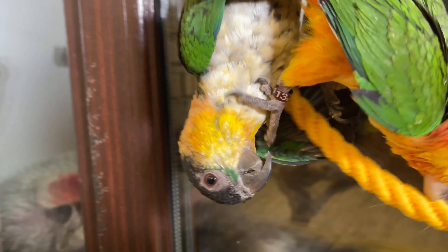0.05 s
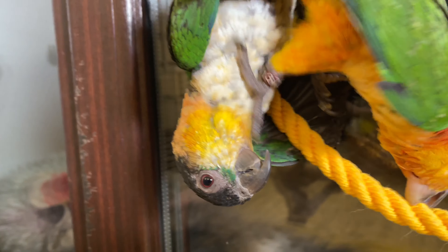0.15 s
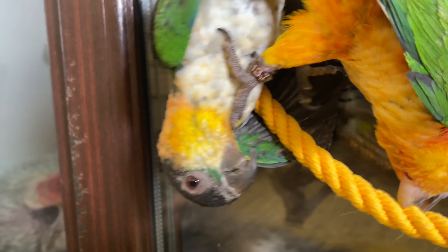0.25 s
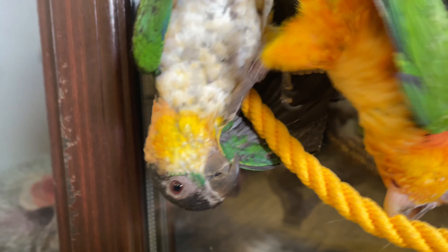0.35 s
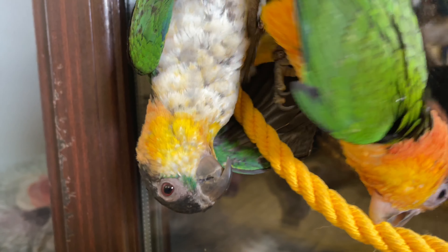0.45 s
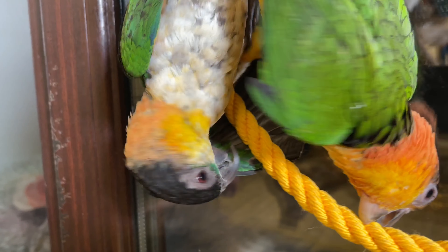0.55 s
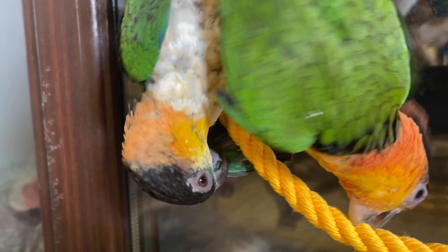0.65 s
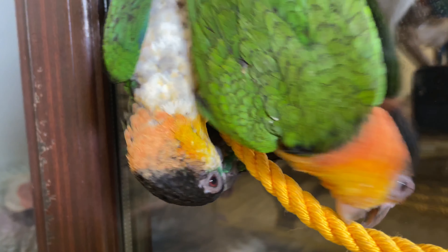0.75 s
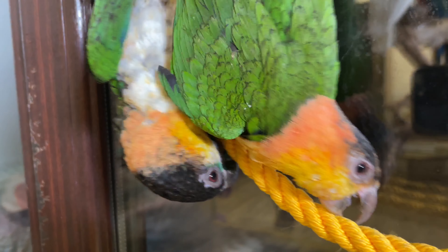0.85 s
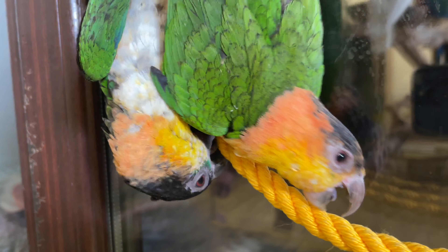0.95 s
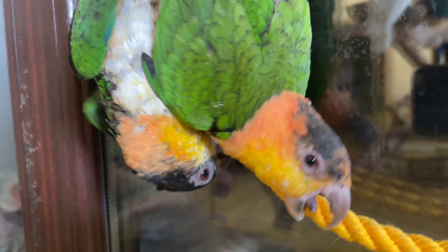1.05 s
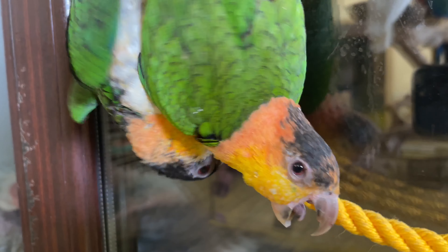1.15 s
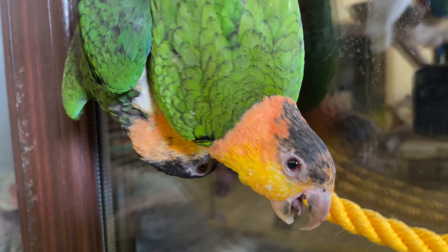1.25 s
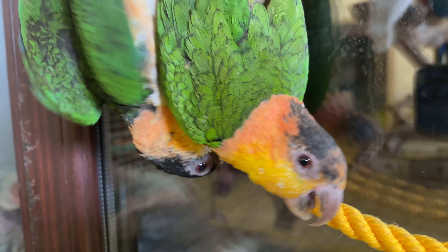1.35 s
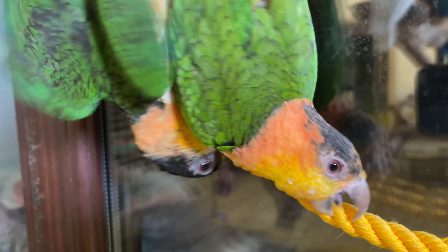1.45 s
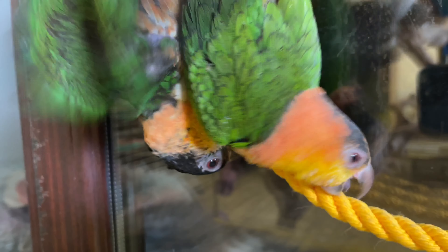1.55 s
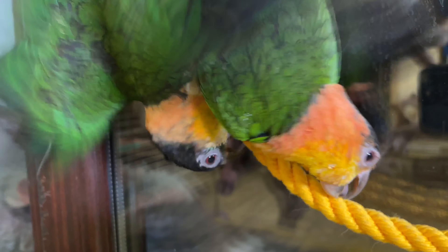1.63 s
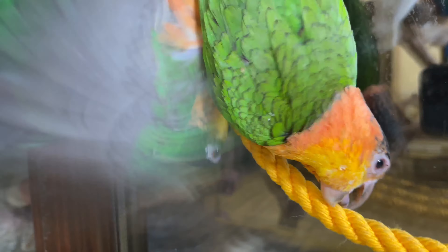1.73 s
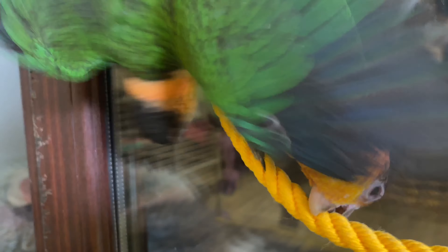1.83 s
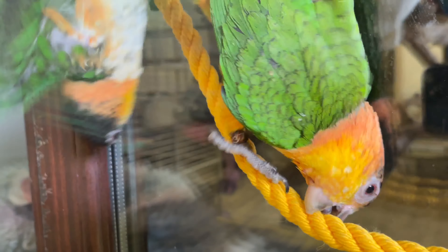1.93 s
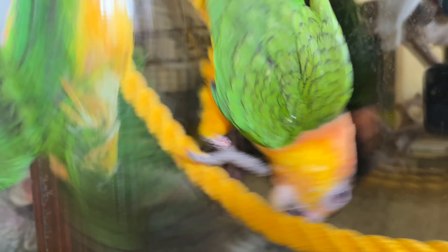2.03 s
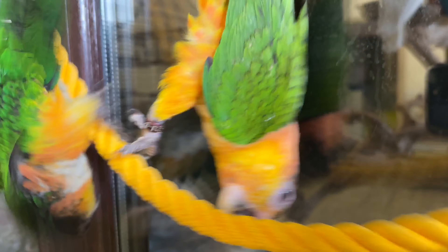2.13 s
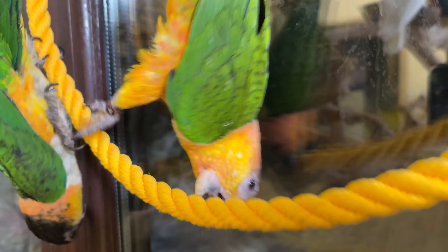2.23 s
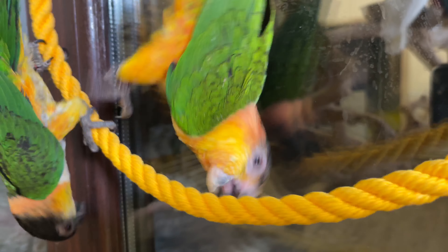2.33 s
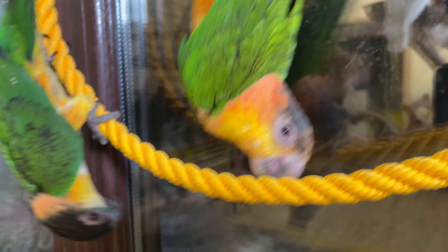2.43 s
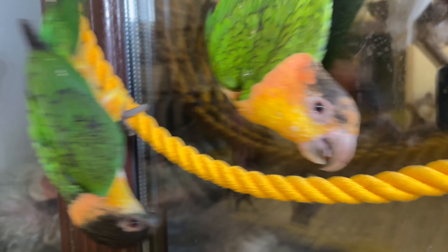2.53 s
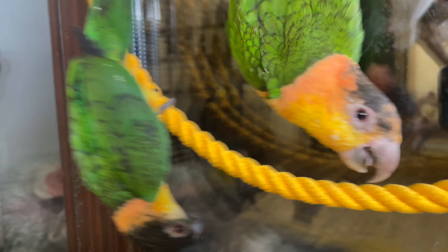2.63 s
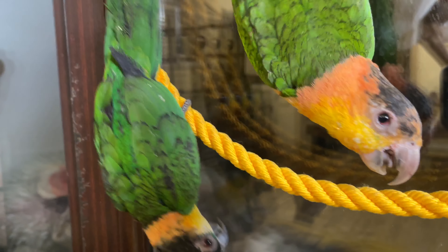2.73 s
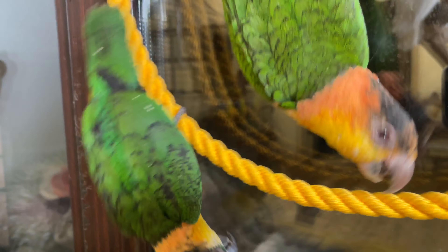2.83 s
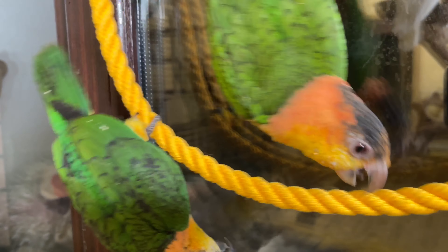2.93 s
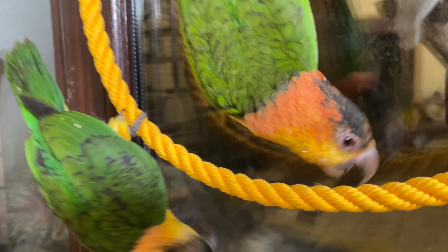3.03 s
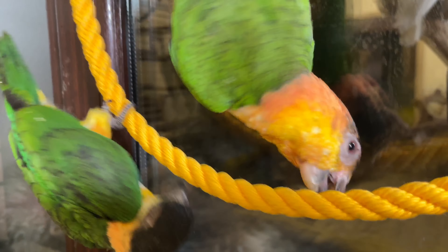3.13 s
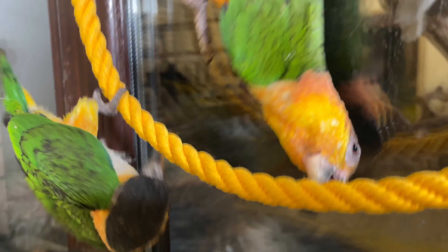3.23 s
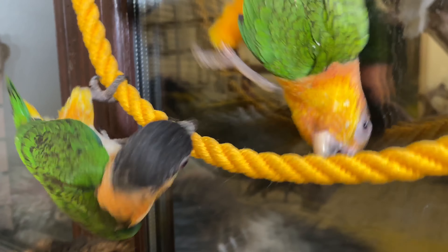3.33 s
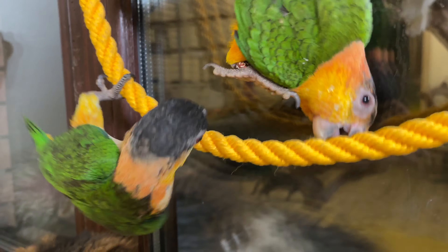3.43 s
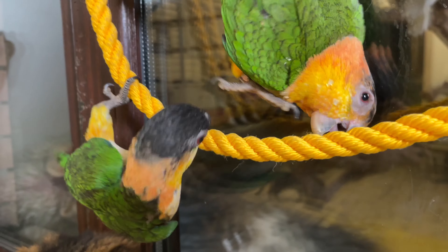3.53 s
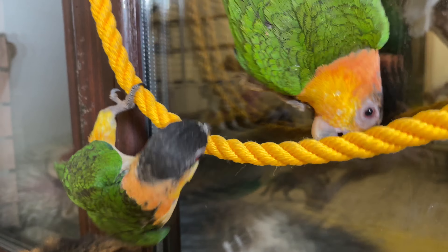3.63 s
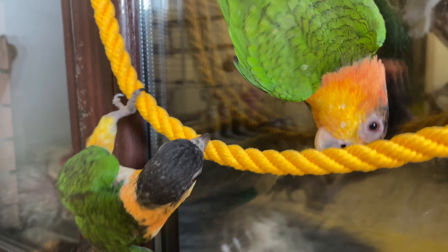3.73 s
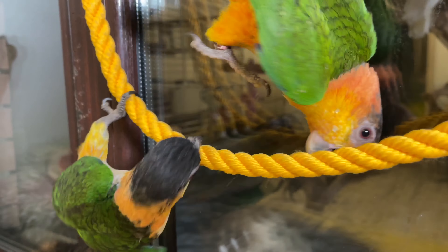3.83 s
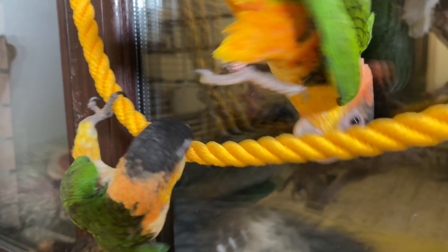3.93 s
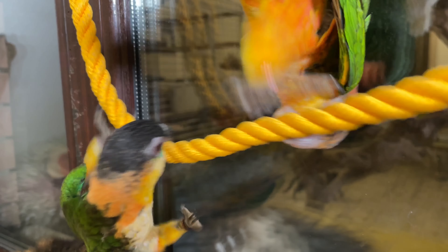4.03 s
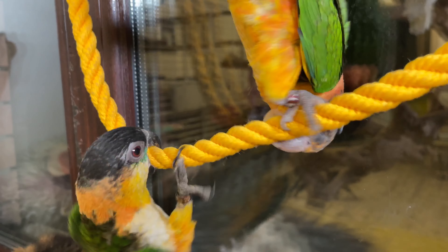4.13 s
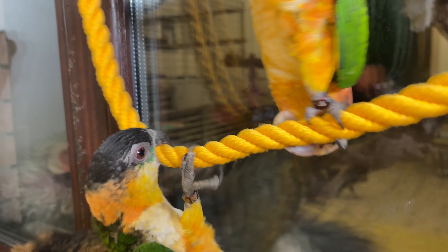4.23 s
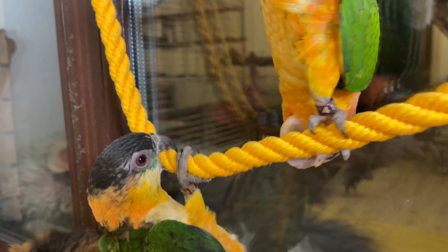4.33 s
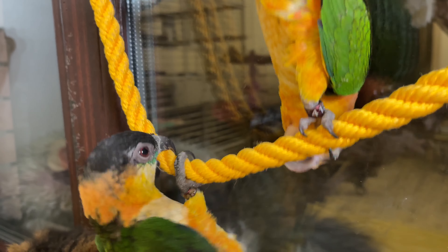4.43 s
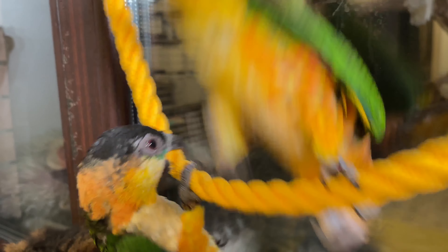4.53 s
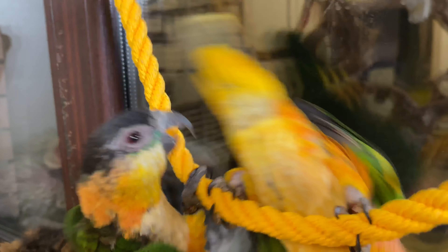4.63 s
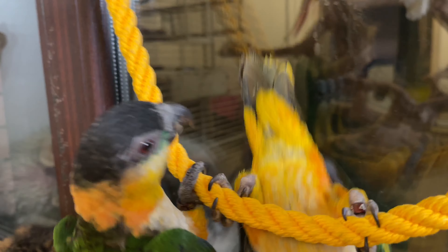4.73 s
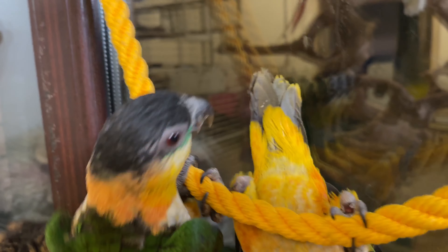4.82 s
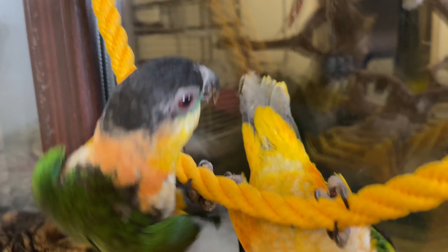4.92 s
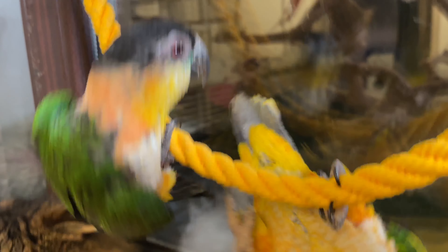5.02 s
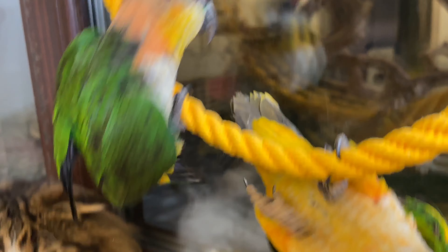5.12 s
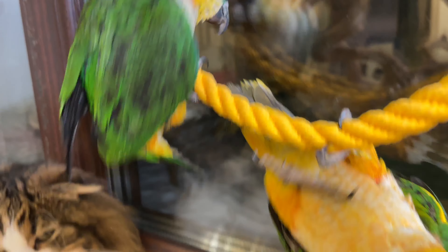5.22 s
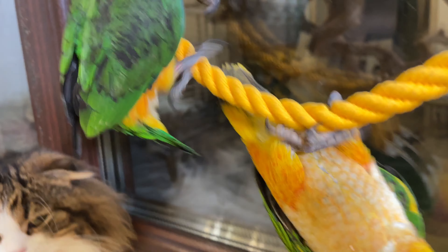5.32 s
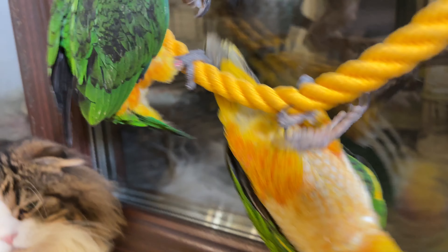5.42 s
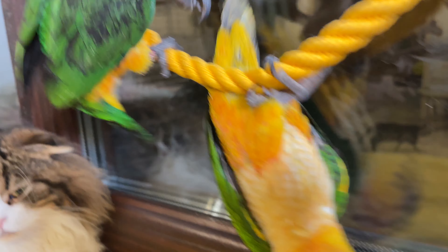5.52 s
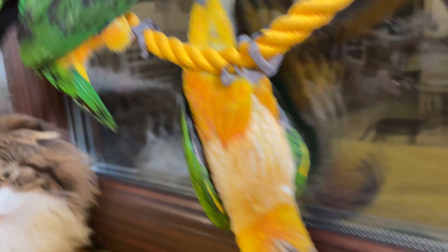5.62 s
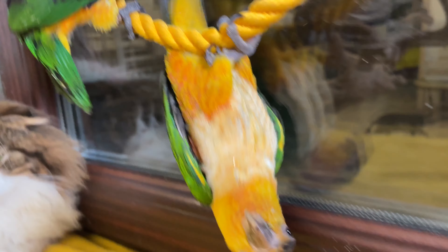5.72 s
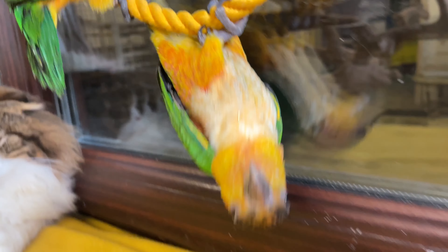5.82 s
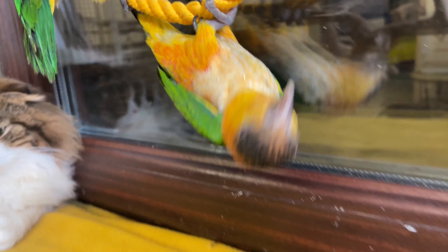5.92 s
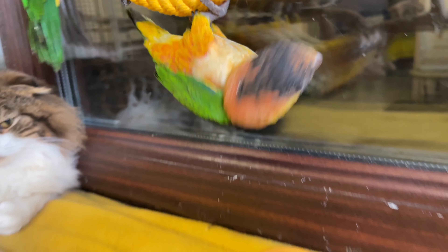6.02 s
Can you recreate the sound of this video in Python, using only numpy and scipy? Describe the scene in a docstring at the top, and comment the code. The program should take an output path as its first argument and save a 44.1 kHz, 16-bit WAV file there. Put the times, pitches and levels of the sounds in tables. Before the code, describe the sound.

Close stereo pickup indoors: steady low hum, soft rope rustle and plumage hiss. A few dry ticks of claws and beaks, one stronger before the wings start. Then rapid flapping bursts in, loud and bassy, puffing air at the microphone. It stops quickly, leaving irregular light clicks and scrapes, faint airy high noise, a woody knock late on and a small glassy tap near the end.

```python
"""Parrots climb on a rope by a window, in stereo: ropes rustle and plumage hisses (coloured noise) throughout.
Claws and beaks tick from early on: scratch, scrape and damped body note; modes of frame and pane ring when knocked.
From 1.6 to 2.1 s wings beat close by: feather slaps (noise bursts), air pushes (slowing swings), a quill snap.
From 3.1 to 5.1 s a thin high whisper comes and goes; more knocks follow on frame and glass.
All along, a motor in the house hums (sine orders) with a faint whine over quiet room tone (noise)."""
import sys
import numpy as np
from scipy import signal
from scipy.fft import rfft, irfft, next_fast_len
from scipy.io import wavfile
from scipy.ndimage import uniform_filter1d

SR = 44100
rng = np.random.default_rng(int(sys.argv[2]) if len(sys.argv) > 2 else 0)


def wrap_up_sound(samples):
    """Save the sound to the file named by the first command line argument, as 16-bit audio."""
    columns = np.atleast_2d(samples).T
    # keep every value between -1 and 1, then stretch to whole-number steps
    tamed = np.clip(columns, -1, 1)
    steps = np.round(tamed * 32767).astype(np.int16)
    wavfile.write(sys.argv[1], SR, steps)


N = 267598  # samples


def from_db(db):
    """Amplitude gain of a level in dB."""
    return 10 ** (np.asarray(db) / 20)


def rms_one(x):
    """Scale to rms 1."""
    return x / np.sqrt(np.mean(x ** 2) + 1e-20)


def at_hz(points, hz):
    """Read a spectrum table on a log frequency axis."""
    table_hz, value = np.transpose(points)
    return np.interp(np.log(hz), np.log(table_hz), value)


def butter(x, order, hz, kind="low"):
    """Butterworth filter."""
    return signal.sosfilt(signal.butter(order, hz, kind, fs=SR, output="sos"), x)


def drift(rate_hz):
    """Slow random wander of spread 1: two-pole lowpassed noise, drawn every 40 samples."""
    step, settle = 40, 2000  # samples, steps
    r = np.exp(-2 * np.pi * rate_hz * step / SR)
    draws = rng.standard_normal(N // step + settle + 2)
    slow = signal.lfilter([1], [1, -2 * r, r * r], draws)[settle:]
    return np.interp(np.arange(N) / step, np.arange(len(slow)), rms_one(slow))


# left-right correlation of diffuse noise, clipped to +-1: f/Hz, likeness
LIKENESS = [(60, 0.99), (130, 0.35), (290, 0.75), (640, 0.46), (1410, 0.24), (3100, 0.38), (6820, 0.52),
            (15000, -1.49)]
# close contacts reach the two ports apart: f/Hz, left lead/rad
LEAD = [(0, 5.6), (1120, 16), (1720, 3.6), (3100, 7.15), (3360, 7.43), (4820, 6.5), (5170, 7.95),
        (5510, 7.76), (7670, 14.63), (12800, 3.77), (13400, 3.8), (14800, 5), (15700, 27), (16500, 10)]


def noise(spectrum, grain_db=0, close=False):
    """Coloured stereo noise, rms 1: grain makes it crackly; a close source is mainly one wave at both ports."""
    size = next_fast_len(N)
    hz = np.arange(size // 2 + 1) * SR / size + 1
    grains = from_db(grain_db * np.minimum(rng.exponential(1, size), 4))
    mid, side = rfft(rng.standard_normal((2, size)) * grains)
    opposed = side * [[1], [-1]]
    if close:
        lead = np.interp(hz, *np.transpose(LEAD))
        pair = mid * np.exp([0 * lead, -1j * lead]) + 0.27 * opposed
    else:
        alike = np.clip(at_hz(LIKENESS, hz), -1, 1)
        pair = np.sqrt(1 + alike) * mid + np.sqrt(1 - alike) * opposed
    return rms_one(irfft(pair * from_db(at_hz(spectrum, hz)), size)[:, :N])


SPLIT_HZ = 6000


def treble_and_middle(spectrum, grain_db):
    """Close contact noise split into two bands, each rms 1."""
    bright = noise(spectrum, grain_db, close=True)
    return [rms_one(butter(bright, 4, SPLIT_HZ, kind)) for kind in ("high", "low")]


def ring(x, hz, t60_s):
    """Damped resonator: a unit click starts a sine of height 1."""
    r, w = from_db(-60 / (t60_s * SR)), 2 * np.pi * hz / SR
    return signal.lfilter([0, np.sin(w)], [1, -2 * r * np.cos(w), r * r], x + 1e-18)


def contact(start_s, rise_s, t60_s, crack_db, pan_db):
    """Slice and panned envelope of a touch: a short crack on a rise that dies away."""
    t = np.arange(round(.25 * SR)) / SR
    swell = (1 - np.exp(-t / rise_s)) * from_db(-60 * t / t60_s)
    crack = from_db(crack_db - 60 * t / 0.0064) * np.minimum(t / 0.00076, 1)
    start = round(start_s * SR)
    return slice(start, start + len(t)), (swell + crack) * from_db([[pan_db / 2], [-pan_db / 2]])


def knocks(hits, modes):
    """Every blow rings every mode, a little differently each time and at each port."""
    out = np.zeros((2, N))
    hit_s, hit_db = np.transpose(hits)
    at = [round(s * SR) for s in hit_s]
    for hz, mode_db, t60_s in modes:
        clicks = np.zeros((2, N))
        clicks[:, at] = from_db(hit_db + mode_db + rng.normal(0, 0.35, (2, len(at))))
        out += ring(clicks, hz, t60_s)
    return out


# wing gusts: t/s, level/dB, swing count at strongest, softness of start
PUSHES = [(1.6118, -15, 2.8, 4), (1.653, -14.5, 1.5, 3.5), (1.6743, 0.5, 1.52, 1.25),
          (1.7417, -8.5, 2.32, 4.9), (1.8165, -7, 2.48, 6.1), (1.861, -25.5, 1.7, 3.4),
          (1.887, -4.5, 2.19, 4.1), (1.938, -20.5, 1.9, 1.4), (1.957, -1.5, 1.82, 3.5),
          (1.997, -24.5, 2.4, 3.1), (2.029, -24, 2.5, 7.5)]
# turbulence on the gust: f/Hz, density/dB
EDDIES = [(120, -21), (250, 8), (400, -6), (700, -7.5), (1200, -41)]
EDDY_DB = -35.5  # re gust strength
FIRST_SWING_S, PUSH_TOP_HZ = 0.003016, 328
RIGHT_SLOWER, RIGHT_LATER_S, RIGHT_PUSH_DB = 1.066, 0.00015, -0.3


def air_pushes():
    """A gust rocks the capsules: each swing outlasts the one before; the far port feels it stretched."""
    out, t = np.zeros((2, N)), np.arange(N) / SR
    ports = [(0, 1, 0), (RIGHT_LATER_S, RIGHT_SLOWER, RIGHT_PUSH_DB)]
    for start_s, level_db, strongest, softness in PUSHES:
        near = slice(round(start_s * SR), round((start_s + .1) * SR))
        for port, (late_s, slower, trim_db) in enumerate(ports):
            since_s = np.maximum(t[near] - start_s - late_s, 0)
            swing = np.sqrt(since_s / (FIRST_SWING_S * slower))  # period grows steadily
            progress = swing / strongest
            size = progress ** softness * np.exp(softness / 2 * (1 - progress ** 2))
            out[port, near] -= from_db(level_db + trim_db) * size * np.cos(2 * np.pi * swing)
    gust = butter(out, 4, PUSH_TOP_HZ)
    strength = uniform_filter1d(np.abs(gust), size=400)
    return gust + from_db(EDDY_DB) * strength * noise(EDDIES)


# feather slaps: t/s, treble level/dB, middle level/dB, dull level/dB, t60/s
SLAPS = [(1.588, -37, -48, -41, 0.045), (1.598, -31, -42, -35, 0.13), (1.653, -12, -29, -30.5, 0.033),
         (1.6555, -42, -41, -27.5, 0.11), (1.7265, -30.5, -41, -32, 0.087), (1.7477, -44, -58, -39, .05),
         (1.8016, -35.5, -46, -36.5, 0.19), (1.867, -29, -34, -28.5, 0.11), (1.9064, -21, -48, -27, 0.035),
         (1.9362, -25, -33, -24, 0.058), (1.941, -30.5, -47, -30.5, 0.079), (2.003, -38, -47.5, -46, 0.15),
         (2.051, -34.5, -44.5, -41, 0.075)]
# feather on feather: f/Hz, density/dB
CLAP = [(880, -23), (1500, -12), (3630, -8), (3970, -6), (4300, -9), (4800, -14.5), (5530, -6.5),
        (6960, -12), (8770, -3), (10100, 0.5), (11400, -5), (12800, -13), (13900, -26), (15700, -18),
        (16500, -44)]
# dull puff: f/Hz, density/dB
DULL = [(90, -26), (150, 2), (300, 1), (450, -5.5), (700, -3.5), (1300, -18), (2200, -13.5), (4000, -41)]
SLAP_RISE_S, SLAP_CRACK_DB, SLAP_PAN_DB = 0.0016, -2, 3


def slaps():
    """Feathers clap and brush together: a crackly bright burst over a dull puff."""
    out = np.zeros((2, N))
    treble, middle = treble_and_middle(CLAP, grain_db=5.5)
    dull = noise(DULL)
    for start_s, treble_db, middle_db, dull_db, t60_s in SLAPS:
        at, shape = contact(start_s, SLAP_RISE_S, t60_s, SLAP_CRACK_DB, SLAP_PAN_DB)
        bright = from_db(treble_db) * treble[:, at] + from_db(middle_db) * middle[:, at]
        out[:, at] += shape * (bright + from_db(dull_db) * dull[:, at])
    return out


# wing tip snaps on the pane and bounces: t/s, level/dB
SNAPS = [(1.6539, -5.5), (1.6553, -16), (1.6570, -25), (1.6590, -30)]
# quill modes: f/Hz, level/dB, t60/s
QUILL = [(373, -3, 0.017), (3440, -6, 0.0067), (4440, -0.5, 0.0035), (8960, -2.5, 0.02),
         (10200, -16, 0.0081)]
SNAP_RIGHT_LATER_SAMPLES, SNAP_RIGHT_DB = 2, -6.5


def snap():
    """Hard quills ring on glass, nearer the left port."""
    left, right = knocks(SNAPS, QUILL)
    return np.array([left, from_db(SNAP_RIGHT_DB) * np.roll(right, SNAP_RIGHT_LATER_SAMPLES)])


FAINT_TICKS, FAINT_HZ, FAINT_T60_S = 12, 1010, 0.027
FAINT_DB, FAINT_SPREAD_DB = (-69.5, -62, -55), 5  # treble, middle, body


def faint_ticks():
    """Rows for small ticks at random times, with pitches within half an octave of the centre."""
    when, pitch = rng.random((FAINT_TICKS, 2)).T
    levels_db = np.array(FAINT_DB) + FAINT_SPREAD_DB * rng.standard_normal((FAINT_TICKS, len(FAINT_DB)))
    start_s = when * (N / SR - .3)
    hz = FAINT_HZ * 2 ** (pitch - .5)
    return [(s, *db, f, FAINT_T60_S) for s, db, f in zip(start_s, levels_db, hz)]


# claw and beak ticks: t/s, treble level/dB, middle level/dB, body level/dB, body f/Hz, t60/s
TICKS = [(0.6724, -74, -57, -39.5, 970, 0.08), (0.7219, -43, -46.5, -40.5, 974, 0.031),
         (0.7553, -74, -48, -50, 1030, 0.038), (0.7927, -60, -46, -39.5, 850, 0.034),
         (0.9997, -68, -52, -31, 1030, 0.014), (1.0896, -68, -46.5, -34.5, 1330, 0.088),
         (1.1215, -72, -51, -50, 1180, 0.084), (1.226, -72, -52, -39.5, 1070, 0.092),
         (1.3138, -52, -61, -41, 1830, 0.041), (1.4622, -78, -29, -25.5, 980, 0.038),
         (2.1045, -54, -32.5, -42, 1200, 0.037), (2.2402, -82, -51, -40, 850, 0.03),
         (2.3517, -61, -49.5, -68, 869, 0.1), (2.486, -80, -72, -47, 1360, 0.093),
         (2.5181, -82, -78, -36, 1640, 0.074), (2.631, -53, -57, -59, 1240, 0.11),
         (2.6706, -39.5, -47.5, -61, 710, 0.01), (2.708, -48, -38.5, -25, 1010, 0.037),
         (2.7355, -46, -42, -43, 1040, 0.032), (2.807, -39.5, -41.5, -45, 2050, 0.028),
         (2.836, -45, -46.5, -55, 770, .029), (2.9213, -42.5, -41.5, -50, 2480, 0.056),
         (2.9717, -43, -55, -52, 710, 0.026), (3.0322, -49, -47, -44, 942, 0.029),
         (3.039, -44, -48, -60, 894, 0.018), (3.132, -54, -57.5, -50.5, 999, 0.078),
         (3.309, -78, -63, -47.5, 940, 0.1), (3.5094, -50, -66, -57, 710, 0.032),
         (3.7269, -66, -70, -37, 1020, 0.047), (3.761, -51, -70, -42, 1040, 0.058),
         (3.8447, -31.5, -35.5, -38, 1200, 0.035), (3.9188, -77, -73, -38.5, 925, 0.034),
         (4.1497, -49, -65, -46, 856, 0.083), (4.202, -44.5, -66, -59, 926, 0.04),
         (4.281, -45, -43, -44, 720, 0.032), (4.3034, -37, -46, -42.5, 1070, 0.023),
         (4.327, -57, -53, -45, 815, 0.044), (4.442, -52, -56, -45, 990, 0.033),
         (4.6796, -64, -50.5, -52, 750, .032), (4.7072, -58, -52, -38, 824, 0.033),
         (5.0944, -64, -86, -53.5, 1880, .025), (5.228, -37.5, -27.5, -27, 1010, 0.045),
         (5.4, -57, -55.5, -52, 703, 0.046), (5.7214, -67, -47.5, -39, 2120, 0.055)]
# contact noise with the microphone's treble peaks: f/Hz, density/dB
BRIGHT = [(880, -48.5), (1500, -29), (1630, -13), (1950, -5.5), (3450, -4), (3970, -5.5), (4300, -4.5),
          (6890, -2), (8770, 10), (10200, 11.5), (11300, 5.5), (12800, -34), (13900, -30), (15700, -18),
          (16500, -34.5)]
# drive of the body note: f/Hz, density/dB
SCRAPE = [(200, -9), (600, -4), (4000, 6), (12000, -13)]
TICK_RISE_S, TICK_CRACK_DB, TICK_PAN_DB = 0.00095, 0, 1
SCRATCH_ROOM_DB, BODY_ROOM_DB = -12, -9
# loud ticks are near and dry, long scrapes fill the room
DRY_ABOVE_DB, DRIER_PER_DB, WETTER_DB_PER_S = -34, 0.9, 82


def ticks():
    """A bright scratch, and a short scrape driving a damped body note; returns direct sound and room send."""
    out, sent = np.zeros((2, 2, N))
    treble, middle = treble_and_middle(BRIGHT, grain_db=6.5)
    scrape = noise(SCRAPE)
    for start_s, treble_db, middle_db, body_db, hz, t60_s in list(TICKS) + faint_ticks():
        at, shape = contact(start_s, TICK_RISE_S, t60_s, TICK_CRACK_DB, TICK_PAN_DB)
        body = from_db(body_db) * ring(shape * scrape[:, at], hz, 5.2 / hz) * np.sqrt(hz / SR)
        scratch = shape * (from_db(treble_db) * treble[:, at] + from_db(middle_db) * middle[:, at])
        out[:, at] += scratch + body
        wet_db = WETTER_DB_PER_S * t60_s - DRIER_PER_DB * max(body_db - DRY_ABOVE_DB, 0)
        sent[:, at] += from_db(SCRATCH_ROOM_DB + wet_db) * scratch + from_db(BODY_ROOM_DB + wet_db) * body
    return out, sent


# knocks on the frame: t/s, level/dB
FRAME_KNOCKS = [(.745, -56.5), (1.187, -50), (2.7075, -51), (5.2285, -33.5)]
# frame modes: f/Hz, level/dB, t60/s
FRAME = [(165, -6, 0.17), (204, -2, 0.27), (255, 3.5, 0.132), (304, -1.5, 0.15), (350, -1.5, 0.075),
         (392, -3, 0.068), (473, -5.5, 0.074), (566, -2.5, 0.073), (658, -6.5, 0.11), (760, -15, 0.041),
         (2700, -13.5, 0.07), (3120, -13, 0.07), (4250, -14, 0.1), (4820, -18, 0.08)]


def frame_knocks():
    """Blows ring the damped modes of the frame."""
    return knocks(FRAME_KNOCKS, FRAME)


# knocks on glass, farther off: t/s, level/dB
GLASS_KNOCKS = [(2.862, -59.5), (5.413, -63.5), (5.7235, -45.5)]
# glass modes: f/Hz, level/dB, t60/s
GLASS = [(1100, -13, 0.13), (1223, -2, 0.34), (1250, -20, 0.24), (1325, 1.5, 0.091), (2053, 4, 0.07),
         (2170, -2, 0.049), (2120, -12, 0.051), (2610, -8, 0.22), (3030, -7.5, 0.27), (3300, -28, .15),
         (4190, -2.5, 0.058), (4500, -13, 0.2)]


def glass_knocks():
    """Blows ring the damped modes of the glass."""
    return knocks(GLASS_KNOCKS, GLASS)


# moving birds: t/s, rope rustle level/dB, scuff level/dB, plumage hiss level/dB
STIR = [(0, -71, -72, -61), (.3, -70, -78.5, -74.5), (.85, -60.5, -73, -71.5), (1.06, -67.5, -67, -54.5),
        (1.17, -61, -55.5, -55.5), (1.4, -58.5, -66, -64), (1.52, -59, -73, -43), (1.78, -60, -57, -47.5),
        (1.92, -56, -51, -39.5), (2.13, -54, -60.5, -52.5), (2.3, -64.5, -62, -62.5),
        (2.62, -57.5, -64, -65), (2.82, -64, -68, -62), (3.1, -65.5, -72.5, -71), (3.45, -70, -68, -66.5),
        (3.8, -65, -70, -58), (4.33, -69, -70.5, -59), (4.97, -66, -72, -64), (5.2, -69, -78.5, -94),
        (5.7, -67.5, -71.5, -63.5), (6.07, -70.5, -67.5, -78)]
# rope rustle: f/Hz, density/dB
RUSTLE = [(150, -5), (260, -5), (400, -7), (680, -6.5), (950, -1), (1300, -15), (2500, -26), (5000, -54)]
# finer scuffing: f/Hz, density/dB
SCUFF = [(600, -40), (1100, -2), (1300, 1.5), (1550, -2), (1850, -0.5), (2300, -6.5), (2900, -6),
         (4500, -18), (7000, -30.5)]
# plumage hiss: f/Hz, density/dB
HISS = [(880, -32), (1500, -14), (2340, -6), (3280, -9), (4640, -5), (7170, -3.5), (9010, 4), (10100, 0),
        (11800, 2.5), (12900, -74), (13700, -60), (14900, -23), (16000, -32)]


def stir():
    """Rope fibres creak and scuff and plumage hisses: grainy noises with fluttering levels."""
    t, (s, rustle_db, scuff_db, hiss_db) = np.arange(N) / SR, np.transpose(STIR)
    rustle = from_db(np.interp(t, s, rustle_db) + 2.5 * drift(25)) * noise(RUSTLE, grain_db=4.0)
    scuff = from_db(np.interp(t, s, scuff_db) + 2.5 * drift(25)) * noise(SCUFF, grain_db=2.5)
    hiss = from_db(np.interp(t, s, hiss_db) + 1.5 * drift(30)) * noise(HISS, grain_db=3.2)
    return rustle + scuff + hiss


# whisper level: t/s, level/dB
WHISPERING = [(3.11, -81), (3.16, -50), (3.33, -77), (3.62, -56.5), (3.7, -63), (3.84, -51), (3.88, -68),
              (4.23, -52.5), (4.65, -69.5), (4.73, -64), (4.93, -60.5), (5.1, -94)]
# whisper colour: f/Hz, density/dB
WHISPER = [(5000, -27), (6000, -2), (6500, 6.5), (7000, 0), (8000, -0.5), (9500, 1), (10200, -30),
           (12000, -34)]


def whisper():
    """Thin high noise that comes and goes."""
    level_db = np.interp(np.arange(N) / SR, *np.transpose(WHISPERING), left=-120, right=-120)
    return from_db(level_db + 1.5 * drift(20)) * noise(WHISPER)


# orders of the motor's turning: multiple, rms level/dB before panning, polarity
MOTOR = [(2, -41, -1), (3, -50.5, 1), (4, -37, 1), (5, -54.5, 1), (6, -65, -1), (7, -57, 1), (8, -72.5, 1),
         (9, -69.5, 1)]
MOTOR_HZ, TURN_START_S, WAVER_DB, HUM_PAN_DB = 24.776, 0.000077, 0.33, 0.6


def hum():
    """Steady sine orders of the motor's turning, each wavering slightly."""
    turn = 2 * np.pi * MOTOR_HZ * (np.arange(N) / SR - TURN_START_S)
    out = np.zeros(N)
    for order, rms_db, polarity in MOTOR:
        peak = np.sqrt(2) * from_db(rms_db + WAVER_DB * drift(1.0))
        out -= np.sign(polarity) * peak * np.sin(round(order) * turn)
    return out * from_db([[HUM_PAN_DB / 2], [-HUM_PAN_DB / 2]])


WHINE_HZ, WHINE_DB, WHINE_WIDTH_HZ = 669, -69, 22


def whine():
    """Faint unsteady whine: noise in a narrow resonance."""
    t60_s = np.log(1000) / np.pi / WHINE_WIDTH_HZ
    tone = rms_one(ring(rng.standard_normal((2, N)), WHINE_HZ, t60_s))
    return from_db(WHINE_DB + 1.6 * drift(0.98)) * tone


# room tone: f/Hz, density/dB
TONE = [(15, -3), (30, 4), (60, 11), (130, -1.5), (220, -8), (330, -25), (680, -29.5), (1200, -43),
        (2500, -40.5), (5000, -39), (8500, -34), (9900, -28), (10300, -52), (12500, -71)]
TONE_DB = -45


def room_tone():
    """Quiet low-heavy noise with a wavering level."""
    return from_db(TONE_DB + 1.7 * drift(19)) * noise(TONE)


ROOM_T60_S, WALL_CUT_HZ, ALIKE_BELOW_HZ = 0.44, 4800, 500


def room(x):
    """Reverb: a dying noise tail, duller than the source; long waves are alike at both ports."""
    t = np.arange(round(.6 * SR)) / SR
    shared, apart = rng.standard_normal((2, len(t)))
    apart = butter(apart, 2, ALIKE_BELOW_HZ, "high")
    decay = from_db(-60 * t / ROOM_T60_S) * np.minimum(t / 0.0034, 1)
    tail = (shared + apart * [[1], [-1]]) * decay
    pole = np.exp(-2 * np.pi * WALL_CUT_HZ / SR)
    tail = signal.lfilter([1 - pole], [1, -pole], tail)
    tail = tail / np.sqrt(np.sum(tail ** 2, axis=1, keepdims=True))  # unit energy
    return signal.fftconvolve(x, tail, axes=1)[:, :N]


FRAME_ROOM_DB, GLASS_ROOM_DB, SLAP_ROOM_DB = -5.5, -2, -19


def scene():
    """Birds, their echo in the room, hum, whine and room tone."""
    tick, sent = ticks()
    slap = slaps() + snap()
    frame, glass = frame_knocks(), glass_knocks()
    sent = sent + from_db(SLAP_ROOM_DB) * slap
    sent = sent + from_db(FRAME_ROOM_DB) * frame + from_db(GLASS_ROOM_DB) * glass
    birds = air_pushes() + slap + tick + frame + glass + stir() + whisper()
    house = hum() + whine() + room_tone()
    return birds + room(sent) + house


STOPBAND_HZ = 16900


def record(dry):
    """Round the peaks softly, then cut the top steeply."""
    top = 1.05
    rounded = top * np.tanh(dry / top)
    return signal.sosfilt(signal.cheby2(16, 100, STOPBAND_HZ, fs=SR, output="sos"), rounded)


dry = scene()
out = record(dry)
wrap_up_sound(out)
```